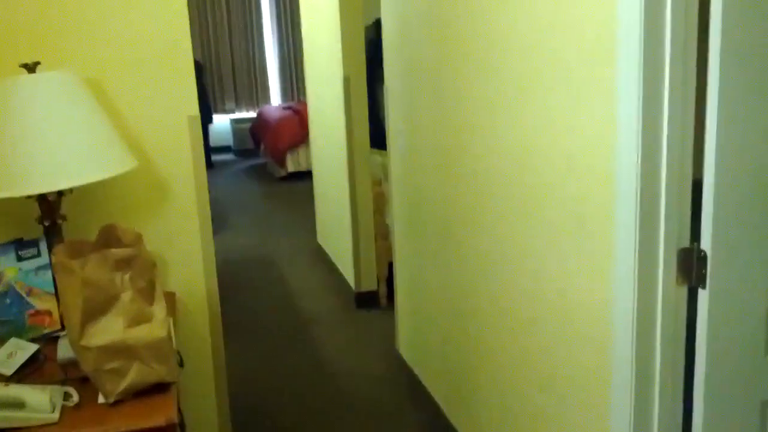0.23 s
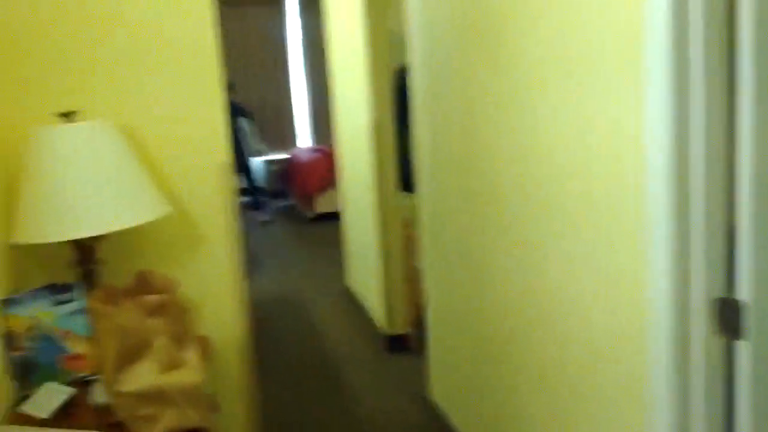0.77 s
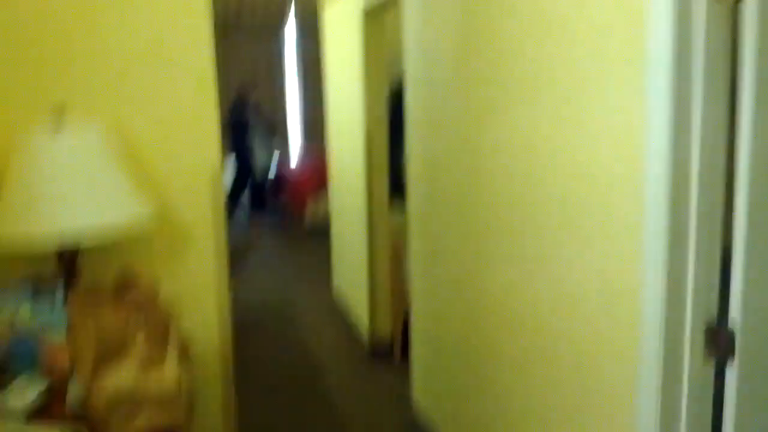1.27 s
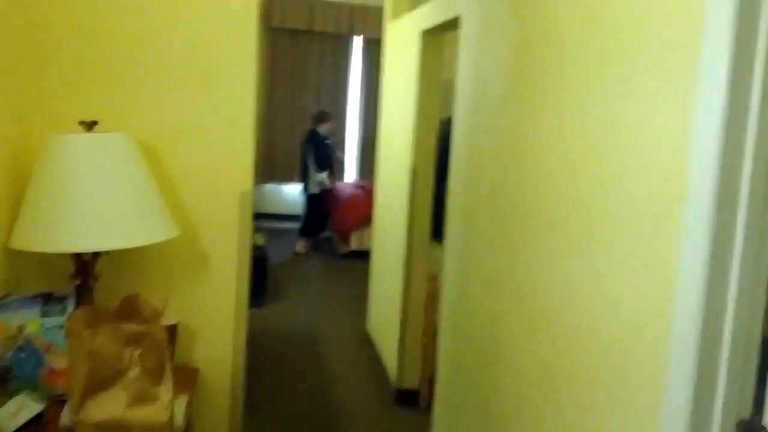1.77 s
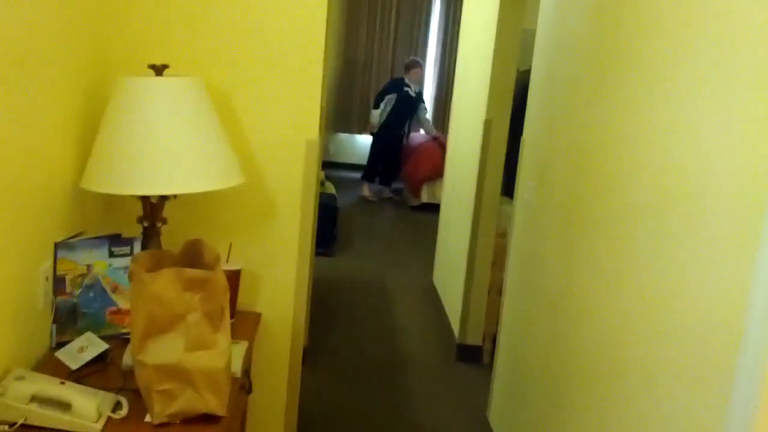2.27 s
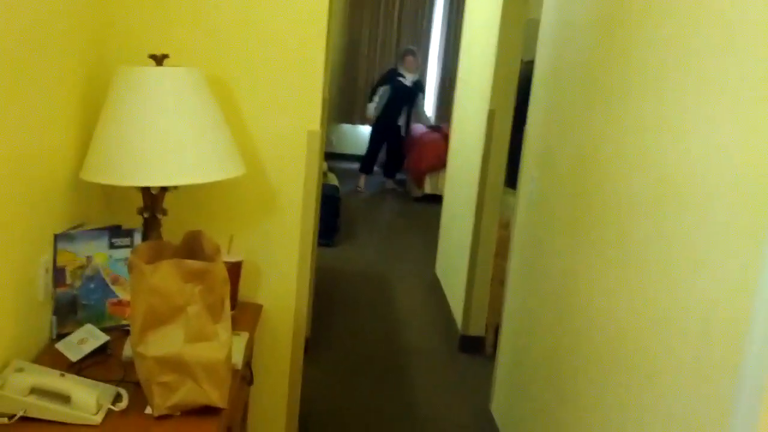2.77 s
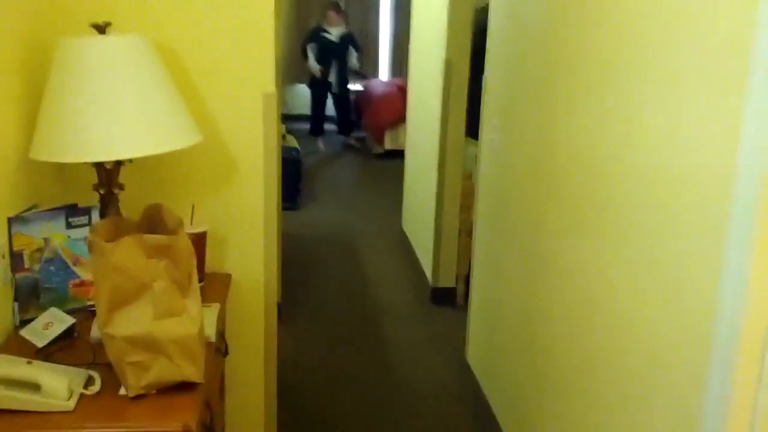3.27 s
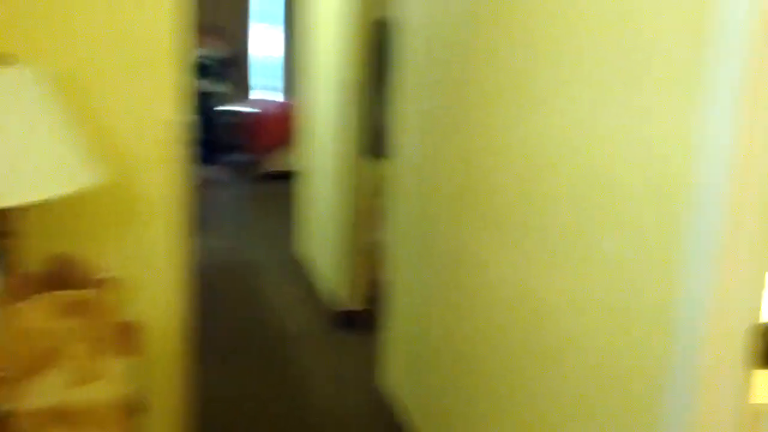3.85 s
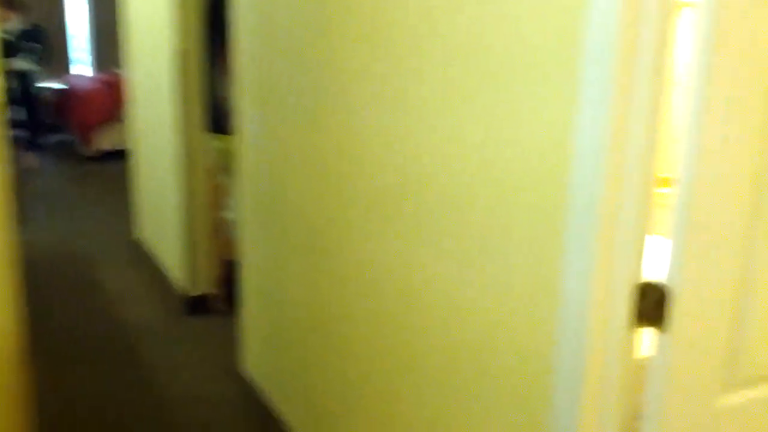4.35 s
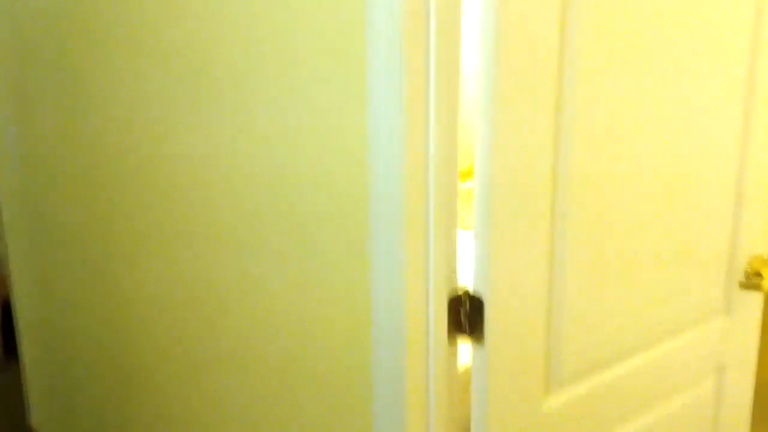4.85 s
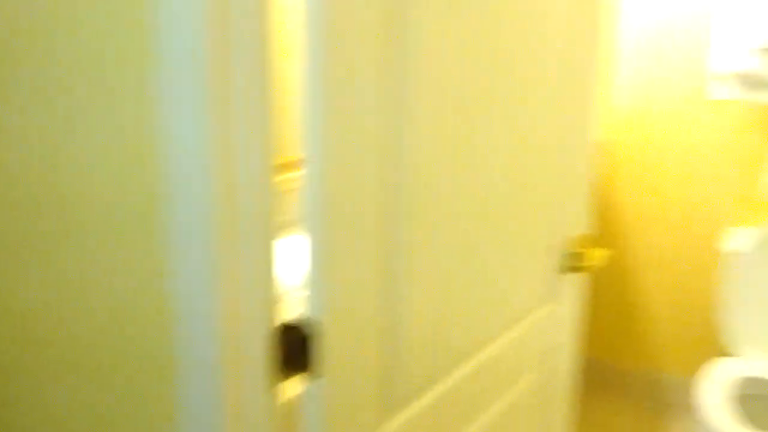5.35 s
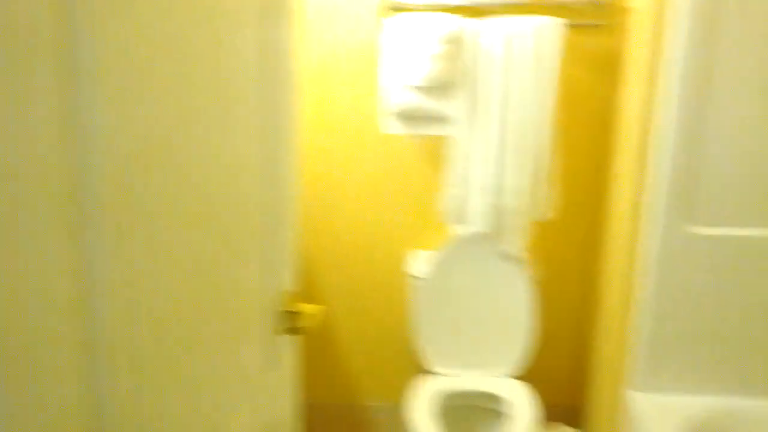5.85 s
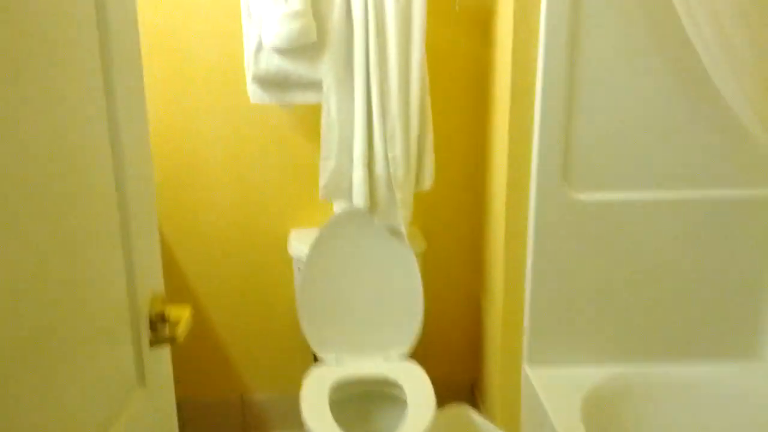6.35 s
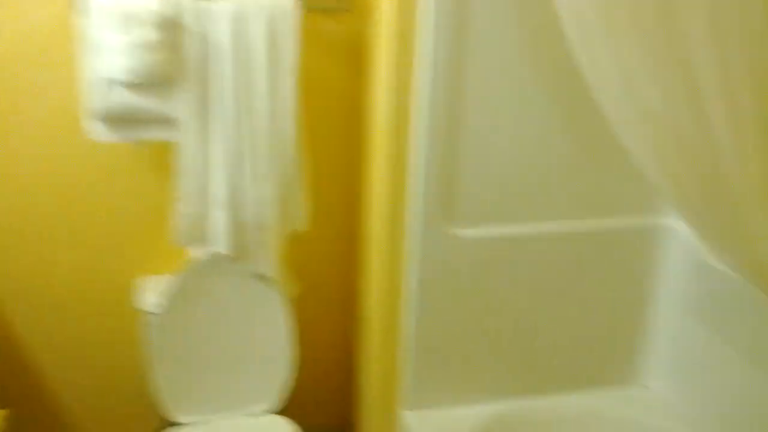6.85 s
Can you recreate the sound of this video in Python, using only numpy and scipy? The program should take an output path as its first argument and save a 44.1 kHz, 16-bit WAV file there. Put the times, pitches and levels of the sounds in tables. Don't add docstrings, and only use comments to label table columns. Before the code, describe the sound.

A small handheld camera's microphone begins in a carpeted hotel room with faint, dull rumble, distant airflow and light hiss. From 0.15 s come tiny plastic ticks; around 0.5 to 1.1 s fingers rub the case, with dull thuds, suction pops and crisp clicks, and more ticks near 1.3 s. At about 2.0 and 2.3 s two hard knocks sound from the far end, each with a short ringing room tail. A quiet gap follows with faint cloth squeaks. From about 2.5 s a bathroom fan's low, steady hum rises, its airflow filling in by 4 s. Loud snaps and peels burst at 3.55 to 3.75 s, a flurry of ticks at 4.2 to 4.6 s, then sharp separate pops near 4.8, 5.2, 5.9, 6.1, 6.35 and 6.74 s. After 5.2 s the hum's overtones clear and the air brightens slightly, continuing steadily to the end.

```python
import sys
import numpy as np
from scipy import signal
from scipy.fft import rfft, irfft
from scipy.io import wavfile
from scipy.ndimage import uniform_filter1d, minimum_filter1d

SR = 44100
rng = np.random.default_rng(int(sys.argv[2]) if len(sys.argv) > 2 else 0)


def elevation(decibels):
    levels = np.asarray(decibels, float)
    return 10 ** (levels / 20)


def log_audio(samples):
    frames = np.atleast_2d(samples).T
    limited = np.clip(frames, -1, 1)
    pcm = np.round(limited * 32767).astype(np.int16)
    wavfile.write(sys.argv[1], SR, pcm)


N = 313992

# time in seconds, nearness from 0 to 1, share of the port
TURN = [
    (0.0, 0.1, 0.76),
    (0.77, 0.06, 0.7),
    (1.21, 0, 0),
    (3.07, 0.51, 0),
    (3.67, 0.89, 0.5),
    (4.02, 0.93, 1),
    (4.52, 0.95, 0.84),
    (4.94, 0.97, 0.07),
    (5.87, 0.92, 0.65),
    (7.12, 1, 0.84),
]

# multiple of the hum, level in dB beside the hum when near.
OVERTONES = [(2, -19), (3, -9.5), (1.22, -7.5)]
# pitch in Hz, level in dB per Hz.
NEAR_AIR = [(97, -29), (165, -3.5), (179, -14), (221, -1.5), (267, -8), (353, -2.5), (541, -10), (725, -10),
            (986, -13.5), (1070, -9.5), (1410, -17.5), (1900, -21), (4000, -27), (5200, -44), (8800, -120)]
# pitch in Hz, level in dB per Hz.
FAR_AIR = [(88, -61), (150, -19), (220, -9), (253, -5.5), (286, -2.5), (319, -11), (398, -6), (444, -9.5),
           (524, -7), (569, -9.5), (999, -14.5), (1190, -18), (4000, -26), (5200, -39), (8800, -120)]
# pitch in Hz, level in dB per Hz.
HISS = [(880, -43), (1500, -11), (1980, -5.5), (2740, -10), (2970, -14.5), (3150, -16), (4460, -11),
        (7100, -12.5), (10700, -16), (13300, -18.5), (16000, -23)]
# pitch in Hz, level in dB per Hz.
RUMBLE = [(8.8, -29), (15, 6.5), (43, 2), (65, 3), (77, -13), (86, -12), (95, -12), (110, 6), (140, -18.5),
          (240, -120)]
# pitch in Hz, width in Hz, level in dB.
DRONES = [(57.5, 4.7, -56), (347.4, 16, -67.5), (401, 6.9, -64.5), (752, 11, -74)]
# pitch in Hz, level in dB.
PANELS = [(215.3, -64), (393, -61)]
HUM_HZ = 119.4
HUM_FAR_DB, HUM_NEAR_DB = -69, -37.5
AIR_FAR_DB, AIR_NEAR_DB, AIR_BEND = -55, -45.5, 2.25
HISS_COVERED_DB, HISS_OPEN_DB = -61, -52.5
RUMBLE_FAR_DB, RUMBLE_NEAR_DB, RUMBLE_BEND = -54.5, -64, 19
DOOR_S, DOOR_PASS_S, DOOR_SHADE_DB, TILES_DB = 5.2, 1, -13, 2

# time in seconds, direct level in dB, room level in dB, share of the
KNOCKS = [
    (1.959, -58, -66, 1),
    (1.9861, -22, -35.5, 0.19),
    (1.993, -21.5, -63, 0.06),
    (2.3058, -56, -59.5, 0.83),
    (2.3284, -24.5, -41, 1),
]
# pitch in Hz, level in dB per Hz.
FIRST_BODY = [(47, -42), (80, -4), (132, -42), (176, -28), (379, -11.5), (503, -13), (641, -13), (971, -7),
              (1260, -23.5), (2040, -2.5), (4500, -27), (11000, -34.5), (15000, -47)]
# pitch in Hz, level in dB per Hz.
SECOND_BODY = [(47, -35), (80, -3), (135, -30), (184, -15), (339, -6), (493, -2.5), (715, -6), (993, -6),
               (1350, -7.5), (2600, -5.5), (5020, -21.5), (9680, -24), (15000, -33)]
# pitch in Hz, level in dB, time to fall 60 dB in seconds.
FIRST_RINGS = [(495, -2, .3), (530, -2, .25), (575, -4, .25), (716, -7, .3), (2945, -9, .26),
               (3806, -15, .24), (985, -7, .25), (1900, -5, .34), (2030, -5, .25), (2100, -1, .44),
               (2256, -1, .26), (2600, -4, .15), (2767, -8, .15)]
# pitch in Hz, level in dB, time to fall 60 dB in seconds.
SECOND_RINGS = [(120, -3, .4), (490, -6, .3), (571, -3, .31), (991, -6, .25), (2024, -1, .12),
                (2261, -2, .18), (1179, -6, .22), (2385, -7, .3), (2560, -6, .45), (2760, -7, .4),
                (2902, -9, .33), (3418, -12, .3)]
# pitch in Hz, width in Hz, level in dB.
FIRST_HOLLOWS = [(536, 160, 5.5), (1420, 110, 10.5), (2024, 200, 3.5), (2670, 310, 4)]
# pitch in Hz, width in Hz, level in dB.
SECOND_HOLLOWS = [(520, 150, 1.2), (1500, 83, 1.3), (2030, 120, 1.6), (2700, 450, 0), (3510, 120, 1.7)]
BETWEEN_HOLLOWS_DB = -1.5
# pitch in Hz, time to fall 60 dB in seconds.
ROOM = [(250, 0.64), (660, 0.49), (1740, 0.37), (4590, 0.34)]

# start in seconds, length in seconds, level in dB, pitch in Hz,
# width in Hz.
SWISHES = [(0.984, 0.082, -58, 10500, 4000), (1.598, 0.076, -57, 4800, 5030),
           (1.982, 0.66, -61.5, 11400, 2500), (2.356, 0.31, -67, 4300, 600), (2.818, .06, -64, 6960, 4040),
           (3.125, 0.15, -61, 5860, 5000), (3.493, 0.092, -55, 5300, 3000), (3.566, 0.028, -35, 4000, 6000),
           (4.054, 0.029, -49.5, 2170, 1500), (4.193, 0.056, -54, 2000, 1200),
           (4.505, 0.09, -57, 7000, 400), (4.832, 0.013, -47, 6000, 4000)]
# start in seconds, length in seconds, level in dB, pitch in Hz,
# width in Hz.
CATCHES = [(4.44, .012, -32, 4500, 4000), (4.484, .014, -40, 3500, 4000), (4.549, .009, -34, 4900, 5000),
           (4.558, .007, -38, 4000, 5000), (5.885, .01, -33, 4800, 4800), (6.346, 0.014, -39, 4500, 5000),
           (6.108, .003, -42, 6300, 5000), (4.82, .03, -50, 7300, 1800), (0.524, .09, -52, 10000, 2000),
           (3.572, .006, -36, 5200, 6000)]

# time in seconds, peak in dB, pitch in Hz.
TICKS = [(0.154, -32, 1330), (0.169, -30.5, 1490), (0.3547, -34, 1960), (1.0204, -26, 10500),
         (1.0848, -42, 3000), (1.2936, -32, 3630), (1.3012, -37, 5300), (3.076, -27.5, 6000),
         (3.106, -31, 5430), (3.133, -32, 5400), (3.477, -25.5, 1920), (3.548, -34, 2500),
         (3.64, -19, 5000), (4.054, -27.5, 1890), (4.181, -33, 6500), (4.285, -36.5, 5400),
         (4.2894, -24.5, 6100), (4.2986, -33, 4600), (4.313, -24, 4600), (4.3568, -34, 4200),
         (4.3806, -22, 4300), (4.419, -24, 3400), (5.155, -30, 3670), (6.098, -42, 4400),
         (6.1087, -38, 3700), (6.402, -30, 4330)]
# time in seconds, peak in dB, pitch in Hz, time to fall 60 dB
# in seconds.
SNAPS = [(0.3921, -45, 2800, .051), (0.522, -14, 5250, 0.014), (1.0672, -24, 2000, .004),
         (1.314, -17, 4100, 0.0042), (1.371, -41, 3200, .046), (3.5772, -2, 4560, 0.055),
         (3.7479, -14, 2690, 0.017), (3.7513, -10, 3000, 0.0018), (4.0934, -29, 3500, .014),
         (5.2186, -11, 2040, 0.0088), (5.8787, -22, 1530, 0.046), (6.3417, -27, 1500, 0.029),
         (6.7392, -16, 6000, 0.013), (4.5441, -24, 1500, 0.01)]
# time in seconds, peak in dB, pitch in Hz.
CREAKS = [(1.0992, -45, 2100), (1.1974, -41, 6100), (1.607, -28.5, 5270), (1.616, -34, 7600),
          (1.849, -38, 3280), (2.665, -40, 3540), (3.6077, -15, 4700), (3.7126, -25, 3200),
          (3.728, -26, 4200), (4.3706, -35, 4700), (4.385, -29, 5000), (4.3905, -29, 6300),
          (4.4004, -16, 4100), (4.804, -38, 1300), (5.501, -37.5, 4200), (5.8508, -41, 1900)]
# time in seconds, peak in dB, pitch in Hz.
PINGS = [(2.8672, -36, 1890)]
SNAP_SPREAD, TICK_SPREAD, CREAK_SPREAD, PING_SPREAD = 0.69, 0.18, 0.38, 0.066
TICK_T60_S, PING_T60_S, CREAK_T60_S, CREAK_SHORTER = 0.0064, 0.012, 0.0099, 0.27
# time in seconds, peak in dB, pitch in Hz, time to fall 60 dB in
# seconds.
CHINKS = [(1.0671, -15, 8140, .006), (1.0672, -26, 11500, .005), (1.959, -38, 2900, .04),
          (1.966, -44, 2400, 0.046), (2.3062, -38, 2700, .025), (2.3062, -39, 2030, .06),
          (4.4362, -9, 6000, 0.0068), (4.5458, -17, 6500, 0.0046), (4.8116, -18.5, 5070, 0.0066),
          (4.8116, -22, 7200, .006), (6.0988, -34, 5050, .012), (6.3495, -30, 3000, 0.011),
          (6.7389, -14.5, 6100, 0.0084), (4.5893, -22, 4520, 0.0054), (4.6045, -26, 4100, .008),
          (4.437, -14, 270, .02), (4.4808, -20, 270, .02), (4.5464, -24, 270, .02),
          (3.6345, -16, 330, .012), (3.5862, -18, 260, .015), (5.2186, -18, 1450, .008),
          (5.2158, -27, 1500, .01), (6.0916, -16, 5500, .004), (6.0905, -26, 4100, .012),
          (6.7392, -20, 1600, .008), (1.987, -24, 540, .09), (2.333, -32, 565, .28),
          (2.336, -26, 2030, .06), (2.35, -30, 2260, .12), (3.594, -14, 1600, .006),
          (0.5218, -20, 4500, .012), (0.5218, -21, 7300, .008), (0.5218, -21, 10500, .009),
          (0.5218, -25, 1900, .01), (0.979, -21, 38, .12), (5.882, -22, 40, .1), (3.5855, -15, 1600, .006),
          (2.12, -40, 2110, .2), (4.4803, -18, 1600, .005)]

# start in seconds, length in seconds, pressure in dB at first, pressure in dB
# at last, brightness in dB.
RUBS = [
    (0.384, 0.14, -45, -47, -9),
    (0.524, 0.2, -52, -81, 10),
    (0.656, 0.047, -17, -26, -9.5),
    (0.692, 0.067, -38, -44, -4.5),
    (.795, 0.1584, -20.5, -20.5, -8.5),
    (1.0585, 0.011, -44, -39, 3),
    (3.345, 0.044, -57, -48, -13),
    (3.612, 0.024, -46, -31, -8),
]
# pitch in Hz, level in dB per Hz.
SKIN = [(240, 5), (400, 0), (676, -2), (1380, -1), (1490, -2.5), (2050, -2.5), (2360, -5.5), (4880, -3.5),
        (10900, -12), (16000, -23)]
# pitch in Hz, level in dB per Hz.
THUD = [(12, -28.5), (20, 7), (172, -4), (228, -11.5), (299, -2.5), (506, -18.5), (600, -8), (780, -66),
        (1320, -120)]
TOUCH_DB, PRESS_DB_PER_S, LIFT_DB_PER_S = -47.5, 898, 1500
PUMP_DB, PUMP_PER_DB, BRIGHT_PER_DB = -6.5, 0.93, -0.14

# time in seconds, suction in dB, width in ms, crack in dB.
POPS = [(0.5239, -30, 0.68, -48), (0.7208, -19.5, 2.7, -25), (0.732, -28, 1.8, -31), (0.742, -25, 4.1, -42),
        (0.751, -30, 1.1, -38), (0.761, -10.5, 0.66, -30), (0.9793, -40, 0.38, -42),
        (0.9888, -21.5, 0.3, -24), (1.0737, -32, 0.5, -36), (1.0768, -40, 0.18, -39),
        (1.101, -45, 1.7, -61), (1.373, -31, 1.1, -47), (3.5562, -26, 4.6, -43), (3.606, -19, 3.6, -46),
        (3.7508, -19, 0.2, -42), (4.5967, -21, 1.05, -29), (4.6041, -22, 1.8, -27.5),
        (4.6221, -20, 1.1, -30.5), (4.8116, -9.5, 0.5, -22.5), (4.8206, -13.5, 0.9, -28.5),
        (4.8391, -21, 1.7, -37), (5.2187, -12, 0.22, -22.5), (5.229, -20, 1.5, -40),
        (5.9733, -23, 0.46, -22.5), (5.9917, -21, 0.4, -25.5)]
# time in seconds, suction in dB, width in ms, drag in dB,
# drag length in ms.
PEELS = [(3.5797, -8.5, 2.5, -29, 8.1), (3.5856, 1.5, 0.47, -23, 3.5), (3.5941, 1.5, 0.57, -39, 12),
         (3.634, 1.5, 0.36, -38, 7.2), (3.753, 1, 0.39, -35, 5.6), (4.4366, -5.5, 0.6, -26.5, 17.5),
         (4.4803, -3, 0.55, -37, 17.5), (4.5458, -3.5, 0.45, -38.5, 18), (4.5896, -6, 0.51, -49, 26),
         (5.8807, 2.4, 0.76, -34.5, 25), (6.0919, -12, 0.15, -46, 12), (6.343, -4.5, 0.34, -40, 36),
         (6.7395, -4, 0.67, -37, 16.4)]
# time in seconds, drop in dB, refill in ms.
TEARS = [(0.5225, -19.5, 1), (0.663, -21, 1), (0.665, -23, .6), (0.677, -17, 1.5), (0.9793, -13, .1),
         (0.988, -21, 0.85), (1.052, -38, .6), (1.0579, -40, .6), (1.064, -30, .3), (1.0735, -24.5, .8),
         (1.0744, -30, .3), (1.0768, -18, 0.16), (1.0796, -31, .6), (1.085, -35, .4), (1.0902, -38, .5),
         (1.096, -38, .4), (1.1015, -32.5, 2), (3.7512, -7, 0.1), (4.4362, -5.5, .5), (4.545, -17, .25),
         (4.5881, -18, .25), (4.8058, -27, .5), (5.2158, -25, .4), (5.2164, -15, 0.22), (5.2175, -17, .5),
         (5.2186, -1.5, .3), (5.8795, -13, .25), (5.973, -9.5, .45), (5.9914, -12.5, .45),
         (6.0901, -20, 0.33), (6.0912, -14, 0.13), (6.0916, -3.5, 0.22), (6.3405, -22, .4),
         (6.3417, -17, .15), (6.7386, -15, .2)]
# time in seconds, push in dB, release in ms.
PUSHES = [
    (0.5219, -14.5, 0.47),
    (3.577, -7.5, .6),
    (6.091, -9, 0.14),
]
POP_DRAG_DB, POP_DRAG_MS = -58.5, 11.5
PEEL_CRACK_DB, CRACK_PER_DB = -12, 1.18
TEAR_MS = 0.032
LEAN, LEAK = 0.71, -0.09


def evened(x):
    return x / np.sqrt(np.mean(x ** 2) + 1e-20)


def read(points, hz):
    f, value = np.transpose(points)
    return np.interp(np.log(hz + 1), np.log(f + 1), value)


def add(mix, s, sound):
    part = mix[max(round(s * SR), 0):][:len(sound)]
    part += sound[:len(part)]


def coloured(x, points):
    gain = elevation(read(points, np.fft.rfftfreq(len(x), 1 / SR)))
    return irfft(rfft(x) * gain, len(x))


def drift(count, rate_hz):
    return evened(signal.lfilter(*signal.butter(2, rate_hz, fs=SR), rng.standard_normal(count)))


def resonate(x, hz, width):
    band = signal.iirpeak(hz, hz / width, SR)
    return signal.lfilter(*band, signal.lfilter(*band, x))


def steadied(x):
    swell = uniform_filter1d(evened(x) ** 2, size=3000)
    return evened(x / (swell + 0.05) ** 0.35)


def wash(points, patchy_db, bands_db):
    a, b, quick, slow = rng.standard_normal((N // 256 + 5, 513, 4)).T
    quick = evened(uniform_filter1d(uniform_filter1d(quick, size=10, axis=0), size=12, axis=1))
    slow = uniform_filter1d(slow, size=24, axis=0)
    slow = np.tanh(evened(uniform_filter1d(slow, size=90, axis=1, mode="wrap")))
    grains = (a + 1j * b) * elevation(patchy_db * quick + bands_db * slow)
    x = signal.istft(grains, nperseg=1024, noverlap=768)[1][:N]
    return evened(coloured(x, points))


def narrow_drones():
    return sum(elevation(db) * steadied(resonate(rng.standard_normal(N), hz, width)) for hz, width, db in DRONES)


def housing_panels(t, lumps_db):
    sway = uniform_filter1d(lumps_db, size=4000)
    out = np.zeros(N)
    for k, (hz, db) in enumerate(PANELS):
        level = elevation(db + 2.0 + 2.5 * np.roll(sway, 40000 * k))
        wobble = 0.8 * np.roll(sway, -30000 * k - 9000)
        out += level * np.sin(2 * np.pi * hz * t + wobble)
    return out


def motor_hum(t, door):
    turns = 2 * np.pi * HUM_HZ * t
    hum = np.sin(turns + 0.095 * drift(N, 2.7)) * elevation(0.86 * drift(N, 6.8))
    shade_db = DOOR_SHADE_DB * (1 - door)
    for k, db in OVERTONES:
        level = elevation(db + shade_db + 1.4 * drift(N, 4))
        hum += level * np.sin(k * turns + 0.3 * drift(N, 3))
    return hum


def fan():
    s, *columns = np.transpose(TURN)
    t = np.arange(N) / SR
    nearness, uncovered = (np.clip(np.interp(t, s, c), 0, 1.2) for c in columns)
    door = np.clip((t - DOOR_S) / DOOR_PASS_S, 0, 1)
    hum_db = HUM_FAR_DB + (HUM_NEAR_DB - HUM_FAR_DB) * nearness
    air_db = AIR_FAR_DB + (AIR_NEAR_DB - AIR_FAR_DB) * nearness ** AIR_BEND + TILES_DB * door ** 2
    hiss_db = HISS_COVERED_DB + (HISS_OPEN_DB - HISS_COVERED_DB) * uncovered
    rumble_db = RUMBLE_FAR_DB + (RUMBLE_NEAR_DB - RUMBLE_FAR_DB) * nearness ** RUMBLE_BEND

    hum = np.sqrt(2) * elevation(hum_db - 1.3) * motor_hum(t, door)
    near = np.clip((air_db + 55.5) / 6, 0, 1)
    air = np.sqrt(near) * wash(NEAR_AIR, patchy_db=0.8, bands_db=1.3)
    air += np.sqrt(1 - near) * wash(FAR_AIR, patchy_db=1.8, bands_db=2.5)
    air *= elevation(air_db - 0.5)
    hiss = elevation(hiss_db - 0.5) * wash(HISS, patchy_db=2.0, bands_db=-0.8)
    lumps_db = 2.2 * drift(N, 14)
    rumble = elevation(rumble_db + 4.5 + lumps_db) * wash(RUMBLE, patchy_db=0.5, bands_db=0.2)
    panels = near * housing_panels(t, lumps_db)
    return panels + hum + air + hiss + rumble + (1 - 0.18 * near) * narrow_drones()


def object_rings(modes, t):
    return evened(sum(elevation(db - 60 * t / min(t60, 0.55)) * np.sin(2 * np.pi * (hz * t + rng.random()))
                      for hz, db, t60 in modes))


def room_tail(count):
    hz, frame_s, z = signal.stft(rng.standard_normal(count), SR, nperseg=128)
    fading = elevation(-60 * frame_s / read(ROOM, hz)[:, None])
    return signal.istft(z * fading, SR, nperseg=128)[1][:count]


def knocks():
    out, t = np.zeros(N), np.arange(SR // 2) / SR
    first_rings, second_rings = object_rings(FIRST_RINGS, t), object_rings(SECOND_RINGS, t)
    for s, direct_db, room_db, share in KNOCKS:
        tail = room_tail(len(t))
        crack = rng.standard_normal(len(t)) * np.exp(-((t - 0.0018) / 0.0014) ** 2)
        air = elevation(direct_db) * evened(crack) / 10
        air += elevation(room_db) * evened(tail) * np.clip(t / 0.0023, 0, 1)
        struck = elevation(-8.0) * air + elevation(direct_db + 27.5) * (t == t[20])
        first, second = (elevation(BETWEEN_HOLLOWS_DB) * air
                         + sum(elevation(db) * resonate(struck, hz, width) for hz, width, db in spots)
                         for spots in (FIRST_HOLLOWS, SECOND_HOLLOWS))
        body = (1 - share) * coloured(first, FIRST_BODY) + share * coloured(second, SECOND_BODY)
        rings = elevation(room_db - 2.5) * ((1 - share) * first_rings + share * second_rings)
        edges = np.clip(t / 0.00017, 0, 1) * np.clip((t[-1] - t) / 0.1, 0, 1)
        add(out, s, (body * elevation(17.0) + rings) * edges)
    return out


def swishes(rows):
    out = np.zeros(N)
    for s, length, db, hz, width in rows:
        count = round(length * SR)
        band = evened(resonate(rng.standard_normal(SR)[:count], hz, width))
        add(out, s, elevation(db) * band * signal.windows.tukey(count, 0.7))
    return out


def ticks():
    out, t = np.zeros(N), np.arange(3000) / SR
    rows = [(s, db, hz, SNAP_SPREAD, t60) for s, db, hz, t60 in SNAPS]
    rows += [(*row, TICK_SPREAD, TICK_T60_S) for row in TICKS]
    rows += [(s, db, hz, CREAK_SPREAD, CREAK_T60_S * elevation(-CREAK_SHORTER * db)) for s, db, hz in CREAKS]
    rows += [(*row, PING_SPREAD, PING_T60_S) for row in PINGS]
    for s, db, hz, spread, t60 in rows:
        grit = rng.standard_normal(len(t))
        burst = (grit - 2.6 * (t == 0)) * elevation(-60 * t / max(t60, 0.002))
        ring = resonate(burst, hz, min(5.1 * spread * hz, 15000))
        add(out, s, elevation(db - 5.5) * ring / abs(ring).max())
    return out


def chinks():
    out, t = np.zeros(N), np.arange(12000) / SR
    for s, db, hz, t60 in CHINKS:
        fading = elevation(db - 60 * t / max(t60, 0.002)) * np.clip(t / 0.0003, 0, 1)
        add(out, s, fading * np.sin(2 * np.pi * hz * t))
    return out


def rub(length, first_db, last_db, shine_db):
    t = np.arange(0, length, 1 / SR)
    friction_db = first_db + (last_db - first_db) * t / length
    friction_db = np.minimum(friction_db, TOUCH_DB + PRESS_DB_PER_S * t)
    friction_db = np.minimum(friction_db, TOUCH_DB + LIFT_DB_PER_S * (length - t))
    pump_db = PUMP_DB + PUMP_PER_DB * friction_db
    bright_db = shine_db + BRIGHT_PER_DB * (friction_db + 18.0)
    slide_grit, pump_grit = rng.standard_normal((2, SR // 4))[:, :len(t)]
    uneven_db = 2.2 * np.clip((friction_db + 55) / 25, 0.3, 1) * drift(SR // 4, 150)[:len(t)]
    slips = coloured(slide_grit * elevation(uneven_db), SKIN)
    high = signal.sosfiltfilt(signal.butter(3, 8000, "high", fs=SR, output="sos"), slips)
    slide = evened(slips - high) + elevation(bright_db) * evened(high)
    pump = evened(coloured(pump_grit, THUD))
    return (elevation(friction_db) * slide + elevation(pump_db) * pump) * signal.windows.tukey(len(t), 0.08)


def pops():
    suction, cracks, scrapes = np.zeros((3, N))
    lead_s = 100 / SR
    ms = (np.arange(3000) - 100) * 1000 / SR
    rows = [(*row, POP_DRAG_DB, POP_DRAG_MS) for row in POPS]
    rows += [(s, db, width, PEEL_CRACK_DB + CRACK_PER_DB * db, *drag) for s, db, width, *drag in PEELS]
    for s, db, width, crack_db, drag_db, drag_ms in rows:
        grit = rng.standard_normal(len(ms))
        side = np.where(ms < 0, LEAN, 2 - LEAN)
        dip = np.exp(-4 * np.log(2) * (ms / max(width, 0.05) / side) ** 2)
        add(suction, s - lead_s, -elevation(db) * dip)
        crack = evened(np.exp(-abs(ms) / np.where(ms < 0, 0.3, 1.1)) * grit)
        add(cracks, s - lead_s, elevation(crack_db - 21.0) * crack)
        fading = np.clip(ms, 0, 1) / (1 + (abs(ms) / drag_ms) ** (150 / drag_ms))
        add(scrapes, s - lead_s, elevation(drag_db + 2.5 - 1.9 * ms / drag_ms) * fading * grit)
    after = np.maximum(ms, 0)
    for size, table in ((-1.05, TEARS), (1, PUSHES)):
        for s, db, refill in table:
            jump = (1 - np.exp(-after / TEAR_MS)) * np.exp(-after / max(refill, 0.05))
            add(suction, s - lead_s, size * elevation(db) * jump)
    spring, sharp = 2 * np.pi * 122, 1.3
    port = signal.bilinear([1, 0.82 * spring, LEAK * spring ** 2], [1, spring / sharp, spring ** 2], SR)
    friction = cracks + signal.lfilter(*signal.butter(1, 12000, fs=SR), scrapes)
    skin_gain = np.std(coloured(rng.standard_normal(8192), SKIN))
    return signal.lfilter(*port, suction) + elevation(2.0) * coloured(friction, SKIN) / skin_gain


def scene():
    background = fan() + knocks()
    hand = swishes(SWISHES) + swishes(CATCHES) + ticks() + chinks()
    for start, *stroke in RUBS:
        add(hand, start, rub(*stroke))
    return (background + hand + pops())[None]


def thin_treble(x):
    hz, t, z = signal.stft(x, SR, nperseg=256, noverlap=192)
    power_db = 10 * np.log10(uniform_filter1d(abs(z) ** 2, size=3, axis=0) + 1e-14)
    treble_db = 10 * np.log10((abs(z[hz > 3000]) ** 2).sum(0) + 1e-14)
    ahead_db = -minimum_filter1d(-treble_db, size=13, origin=-6) - treble_db
    behind_db = -minimum_filter1d(-treble_db, size=49, origin=24) - treble_db
    chance = rng.random((len(hz) // 2 + 1, len(t) // 12 + 1))
    edge_hz = np.repeat(5500 + 9000 * chance[0] ** 2, 12)[:len(t)]
    before_click = (ahead_db > 24) & (hz[:, None] > edge_hz + 6000 * (behind_db > 14))
    odds = 0.25 * np.clip((hz[:, None] - 10500) / 5500, 0, 1) ** 2 * (power_db < -72)
    draws = np.repeat(np.repeat(chance, 2, axis=0), 12, axis=1)[:len(hz), :len(t)]
    kept = np.where(before_click | (draws < odds), 0.03, 1)
    return signal.istft(z * kept, SR, nperseg=256, noverlap=192)[1][:N]


def band_limit(x):
    return signal.sosfilt(signal.butter(12, 16820, fs=SR, output="sos"), x)


def record(dry):
    hissing = dry[0] + elevation(-72.0) * rng.standard_normal(N)
    clipped = np.clip(hissing, -0.71, 0.71)
    low_pass = signal.firwin(255, 15800, window=("kaiser", 7), fs=SR)
    mix = thin_treble(signal.oaconvolve(clipped, low_pass, "same"))[None]
    return band_limit(mix)


dry = scene()
out = record(dry)
log_audio(out)
```